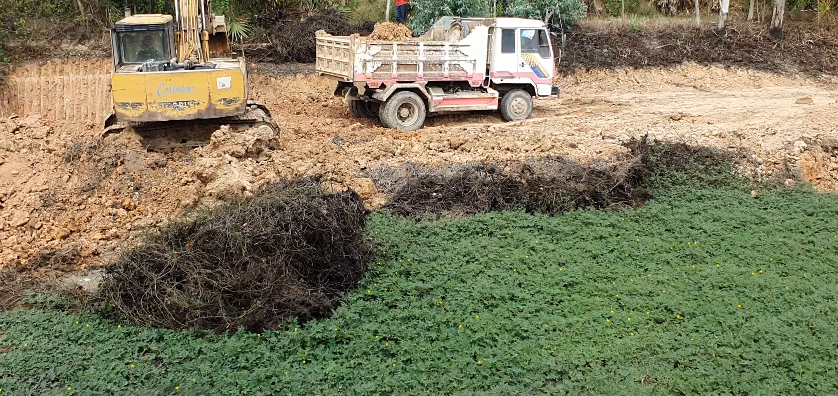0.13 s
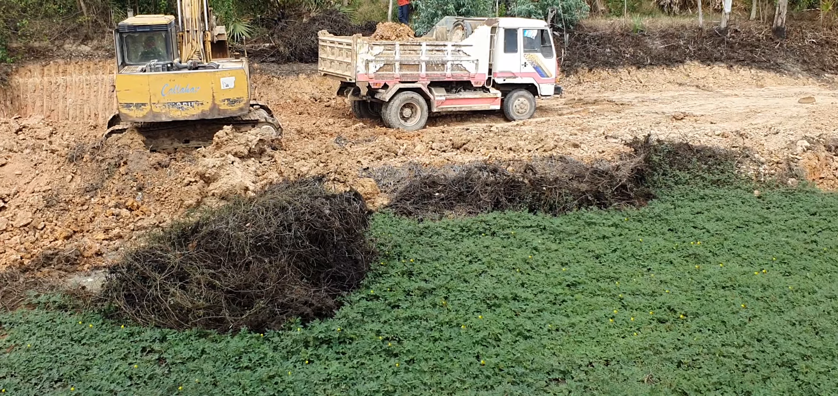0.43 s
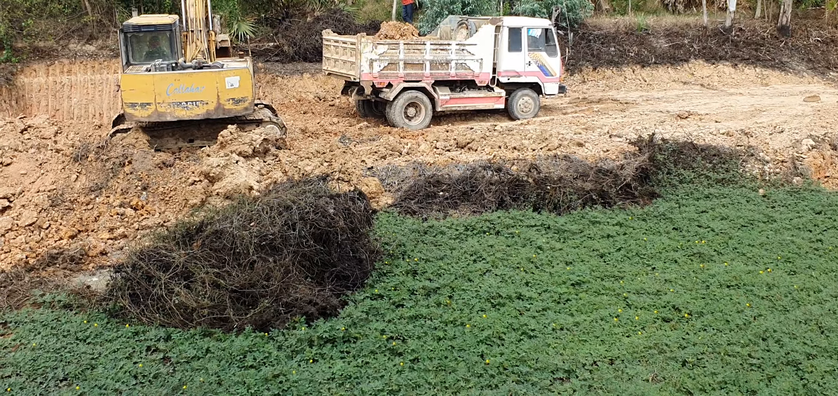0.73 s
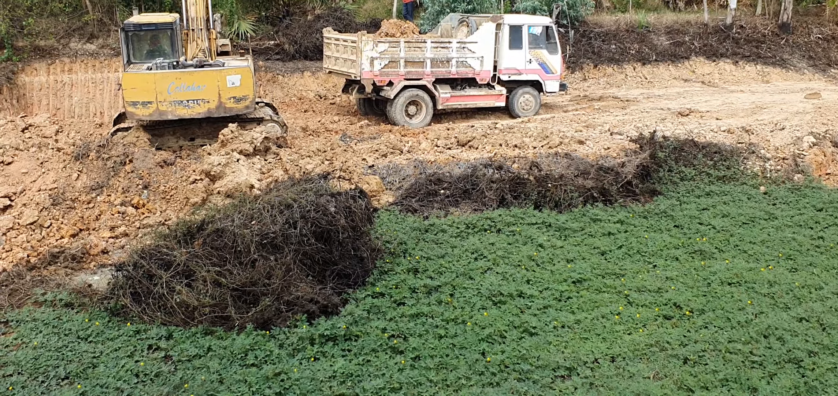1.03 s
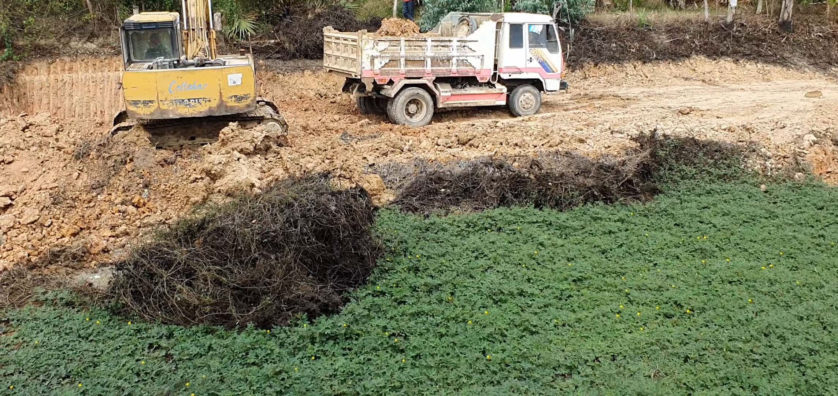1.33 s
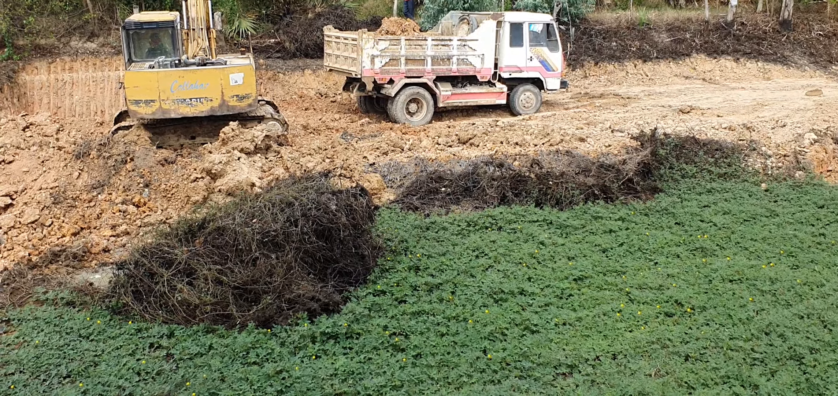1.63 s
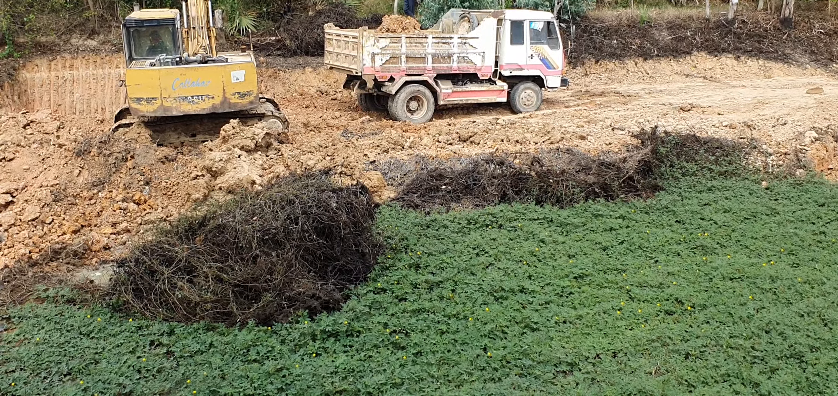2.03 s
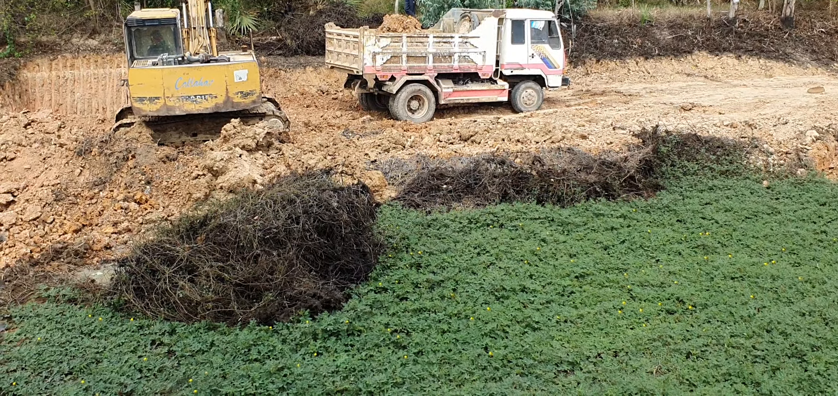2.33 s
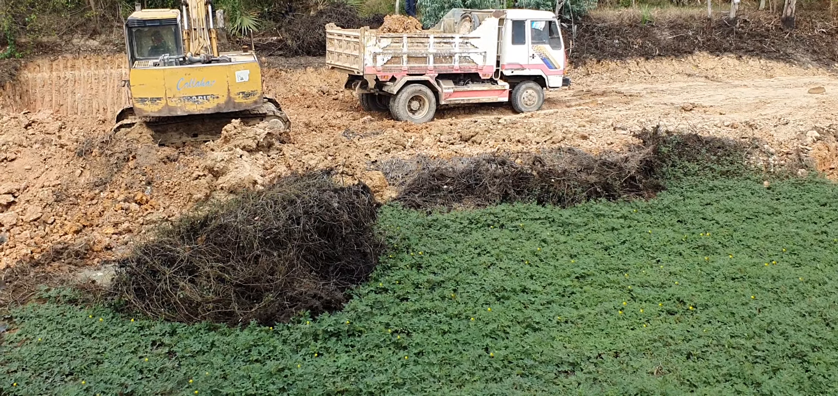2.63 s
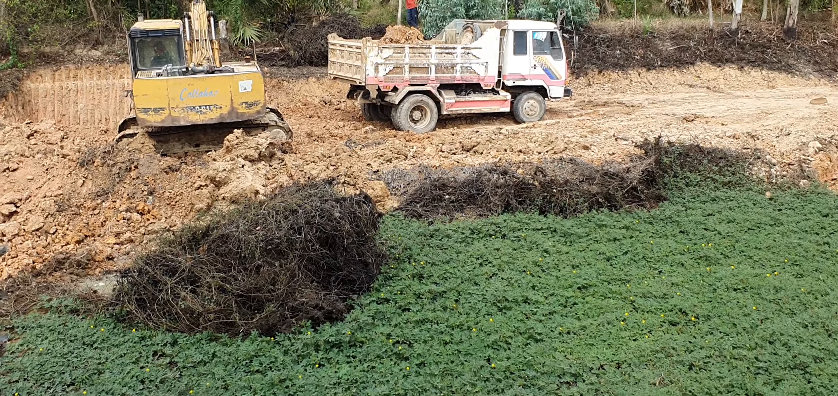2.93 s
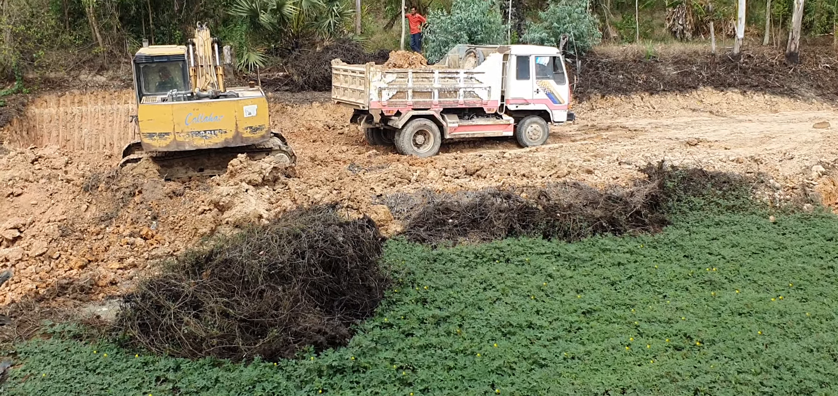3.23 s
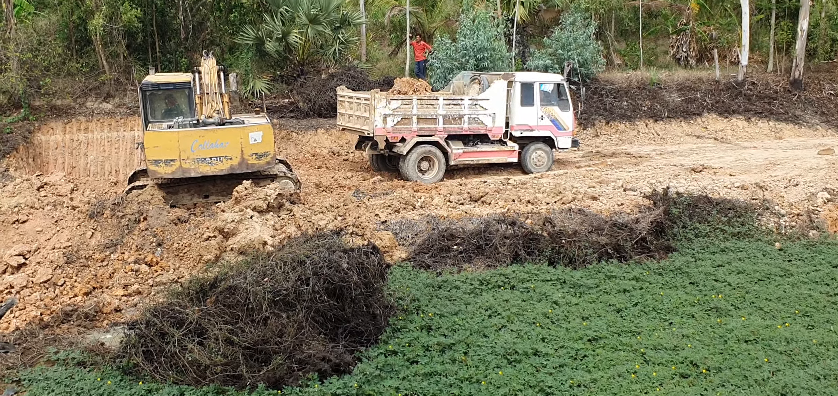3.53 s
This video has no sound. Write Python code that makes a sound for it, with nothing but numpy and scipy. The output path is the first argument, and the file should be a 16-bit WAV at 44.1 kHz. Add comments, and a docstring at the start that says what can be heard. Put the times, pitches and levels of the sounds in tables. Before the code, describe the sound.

Heavy diesel machinery runs with a throbbing rumble, light rattling and a single clank.

```python
"""An open earthworks site: off to the left, by an excavator and a dump truck, a four-cylinder diesel runs.
Its exhaust throbs at the firing rate and drones on the fifth firing harmonic; block clatter, hiss and
a gritty rasp pulse with the firings. The speed lifts a little, then sags as a load comes on, and a
loose panel rattles. Steelwork scrapes, clanks once and squeaks faintly; a thin whine flutters behind."""
import sys
import numpy as np
from scipy import signal
from scipy.fft import rfft, irfft
from scipy.io import wavfile

SR = 44100
rng = np.random.default_rng(int(sys.argv[2]) if len(sys.argv) > 2 else 0)


def dump_mix(stems):
    """Bounce the given channels to the path in sys.argv[1] as a 16-bit WAV at rate SR."""
    frames = np.atleast_2d(stems).T  # one column per channel
    limited = np.clip(frames, -1, 1)  # hard clip at full scale
    pcm = np.round(limited * 32767).astype(np.int16)
    wavfile.write(sys.argv[1], SR, pcm)


N = 161847
T = np.arange(N) / SR
HZ = np.maximum(np.arange(N // 2 + 1) * SR / N, 1)
FIRINGS_PER_TURN = 2

# crankshaft speed: t/s, speed/(turns per s)
CRANK_SPEED = [(0.0, 27.6), (0.15, 27.8), (0.4, 28.4), (0.6, 28.4), (0.72, 29.1), (0.93, 28.85),
               (1.07, 27.868), (1.45, 27.995), (1.72, 27.7), (1.86, 27.614), (2.08, 27.59), (2.65, 27.66),
               (2.95, 27.3), (3.12, 27.6), (3.27, 27.251), (3.67, 27.4)]


def from_db(db):
    """Decibels to gain."""
    return 10 ** (np.asarray(db) / 20)


def unit_rms(x):
    """Scale to unit power."""
    return x / np.sqrt(np.mean(np.abs(x) ** 2) + 1e-20)


def in_time(rows):
    """A curve of (t/s, value) rows at every sample."""
    return np.interp(T, *np.transpose(rows))


def at_hz(rows):
    """A curve of (f/Hz, value) rows at every frequency."""
    hz, value = np.transpose(rows)
    return np.interp(np.log(HZ), np.log(hz), value)


def pan(left_db):
    """Left and right gains, the left louder by left_db; their mean is 1."""
    gains = from_db(np.array([[.5], [-.5]]) * left_db)
    return gains / gains.mean(0)


def drift(rate):
    """Smooth random motion of rms 1, changing about `rate` times a second."""
    hop, settle = 40, 2000
    pole = np.exp(-2 * np.pi * rate * hop / SR)
    noise = rng.standard_normal(N // hop + settle + 2)
    slow = signal.lfilter([1], [1, -2 * pole, pole * pole], noise)[settle:]
    return np.interp(np.arange(N) / hop, np.arange(len(slow)), unit_rms(slow))


def channel_phase():
    """The left leads slightly: earlier arrival in mids and treble, microphone phase mismatch in bass."""
    # lead of the left channel: f/Hz, lead/ms
    lead = [(55, 0.59), (280, 0.099), (1100, .14), (1900, 0.21), (3300, 0.35), (6000, 0.219), (9000, 0.264),
            (15000, 0.298)]
    return np.exp(2j * np.pi * HZ * at_hz(lead) / 1000 * np.array([[.5], [-.5]]))


def air_noise(spectrum):
    """Stereo noise of the given colour, wider towards the treble; rms 1."""
    # likeness of left and right: f/Hz, coherence/0-1
    likeness = [(50, .99), (250, .96), (430, .9), (600, .92), (1000, .76), (1500, .62), (2500, .48),
                (3300, .26), (6000, .45), (10000, .33), (16000, .28)]
    alike = at_hz(likeness)
    mid, side = rfft(rng.standard_normal((2, N)))
    pair = np.sqrt(1 + alike) * mid + np.sqrt(1 - alike) * side * [[1], [-1]]
    return unit_rms(irfft(pair * spectrum * channel_phase(), N))


def partial(angle, unsteady, rate):
    """One stereo tone whose `unsteady` share (0-1) wanders in level and phase; rms about 1."""
    wander = np.sqrt(1 - unsteady ** 2) + unsteady * unit_rms(drift(rate) + 1j * drift(rate))
    pitch_bin = int(angle[-1] / (2 * np.pi))
    tone = np.exp(1j * (angle + rng.uniform(0, 2 * np.pi)))
    return np.sqrt(2) * np.real(channel_phase()[:, [pitch_bin]] * wander * tone)


def resonances(modes):
    """Spectrum of a body from its (f/Hz, width/Hz, level/dB) rows."""
    powers = (from_db(db) ** 2 / (1 + (2 * (HZ - hz) / width) ** 2) ** 2 for hz, width, db in modes)
    return np.sqrt(sum(powers))


def bursts(crank, per_turn, decay_s, uneven_db):
    """Envelope of sharp, uneven hits locked to the crank; rms 1."""
    cycles = per_turn * crank / (2 * np.pi) + .7
    age = cycles % 1 / (per_turn * in_time(CRANK_SPEED))
    strength = from_db(uneven_db * rng.standard_normal(size=400))[cycles.astype(int)]
    return unit_rms(strength * (1 - np.exp(-age / .0008)) * np.exp(-age / decay_s))


def site_echoes(count=10, share=0.2):
    """Weak reflections from bank, truck and trees comb the spectrum of each channel."""
    lags_s = rng.uniform(.002, .03, (count, 1, 1)) + rng.uniform(-.0002, .0002, (count, 2, 1))
    return np.abs(1 + share / np.sqrt(count) * np.exp(-2j * np.pi * HZ * lags_s).sum(0))


def squeaks():
    """Dry joints give thin, wavering squeaks that swell and fade."""
    # squeaks: t/s, length/s, f/Hz, half-width/Hz, level/dB
    cues = [(.51, .28, 8660, 150, -61), (.595, .025, 5900, 250, -53), (2.505, .06, 10700, 250, -55),
            (2.762, .015, 5900, 150, -49), (3.22, .22, 8650, 800, -59), (3.238, 0.19, 5800, 600, -51.5),
            (3.608, 0.036, 5640, 200.3, -54)]
    out = np.zeros((2, N))
    for start, length, hz, half_width, db in cues:
        swell = np.cos(np.pi * np.clip((T - start) / length, -.5, .5))  # peaks at the cue time
        out += from_db(db) * swell * air_noise(1 / (1 + ((HZ - hz) / half_width) ** 2))
    return out


def whine(hz=582):
    """A fluttering tone that holds its pitch whatever the engine speed."""
    # surges of the whine: t/s, level/dB
    level = [(0, -41), (.36, -45), (.41, -33), (.48, -33), (.52, -42), (.6, -35.5), (.73, -45),
             (.78, -30.5), (.85, -29), (.91, -43), (1.07, -36), (1.2, -50), (1.95, -43), (2.03, -27),
             (2.12, -39), (3.0, -38.5), (3.67, -39)]
    return from_db(in_time(level)) * partial(2 * np.pi * hz * T, unsteady=0.71, rate=16.5)


def scrapes(grit_db=3.5):
    """Steel drags over stony ground in short gritty strokes; dull ones favour the lowest ring."""
    # strokes: t/s, length/s, level/dB, low-pass/Hz
    strokes = [(.925, 0.067, -35, 6000), (.958, 0.046, -32, 1400), (.97, 0.11, -42, 5000),
               (1.07, 0.062, -38, 2500)]
    # resonances of the scraping steel: f/Hz, width/Hz, level/dB
    modes = [(840, 110, 11), (1350, 180, 8), (1900, 330, 2), (2520, 400, 2), (3280, 500, -4),
             (4100, 980, -7), (5600, 1200, -11)]
    out, body = np.zeros((2, N)), resonances(modes)
    grit = unit_rms(from_db(grit_db * drift(rate=77)))
    for start, length, db, bright_hz in strokes:
        along = np.clip((T - start) / length, 0, 1)
        stroke = 2 * np.sqrt(along * (1 - along))
        out += from_db(db) * stroke * grit * air_noise(body / np.hypot(1, (HZ / bright_hz) ** 2))
    return out


def clank():
    """Three quick bumps ring and rattle the steelwork; a softer contact loses the upper modes."""
    # bumps: t/s, level/dB, low-pass/Hz, relative rattle level/dB, rattle t60/s
    bumps = [(1.591, -21.5, 2040, -5, .22), (1.617, -28.5, 2540, -4.5, 0.22), (1.672, -34, 1300, -1, .2)]
    # modes of the steelwork: f/Hz, relative level/dB, t60/s
    modes = [(337.7, 6, 0.4), (504, -2.5, 0.3), (726, -2, .22), (876, 4, 0.24), (903, 2, 0.17),
             (1136, -3, 0.11), (1148, 3, 0.15), (1290, 4, 0.091), (1488, 1.5, 0.15), (1610, -6, 0.16),
             (1870, -3.5, 0.16), (2200, -11, .16), (2440, -16, .14)]
    out = np.zeros((2, N))
    for start, db, bright_hz, rattle_db, rattle_t60 in bumps:
        age, ring = np.maximum(T - start, 0), 0
        for hz, mode_db, t60 in modes:
            contact = 1 / np.hypot(1, (hz / bright_hz) ** 4)
            tone = np.sin(2 * np.pi * hz * age + rng.uniform(0, 2 * np.pi))
            ring += contact * from_db(mode_db - 60 * age / t60) * tone
        colour = HZ / (HZ + 900) ** 2 * (HZ / (HZ + 300)) ** 2 / np.hypot(1, (HZ / bright_hz) ** 3)
        rattle = air_noise(colour) * from_db(rattle_db - 60 * age / rattle_t60)
        attack = 1 - np.exp(-age / 0.0034)
        out += from_db(db) * attack * (0.41 * ring + rattle)
    return pan(left_db=0.5) * out


def panel(crank):
    """A loose panel chatters once a turn, surging as the engine labours."""
    # surges of the chatter: t/s, level/dB
    level = [(0, -43.5), (1.0, -44), (1.85, -48), (2.04, -45), (2.1, -34), (2.25, -39), (2.35, -38.5),
             (2.55, -45), (2.85, -46), (3.3, -49), (3.38, -39), (3.46, -47), (3.67, -44)]
    # resonances of the panel: f/Hz, width/Hz, level/dB
    modes = [(830, 140, 5), (1215, 40, -4), (1510, 37, 10.5), (1690, 90, -3), (1936, 110, 9), (2090, 66, 6),
             (2870, 200, -2.5), (3220, 160, -4.5)]
    shakes = bursts(crank, per_turn=1, decay_s=0.064, uneven_db=4)
    return pan(left_db=0.5) * from_db(in_time(level)) * shakes * air_noise(resonances(modes))


def rasp(crank):
    """Each firing shakes a short, bright burst out of loose metal."""
    # rasp coming in with the load: t/s, level/dB
    level = [(0, -73), (.45, -68), (.9, -72), (1.1, -58), (1.45, -53.5), (1.62, -51.5), (1.69, -47),
             (1.85, -48.8), (2.0, -52.5), (2.14, -49.5), (2.25, -56), (2.5, -54), (2.7, -59), (3.05, -73),
             (3.22, -56), (3.29, -52), (3.37, -67), (3.67, -57)]
    # resonances of the loose metal: f/Hz, width/Hz, level/dB
    modes = [(4899, 900, 4), (5950, 1200, 5), (8700, 2150, -3.5), (11200, 1300, 0.5), (12800, 1400, -4),
             (14900, 1500, -2)]
    shakes = bursts(crank, FIRINGS_PER_TURN, decay_s=0.013, uneven_db=2)
    return pan(left_db=1.5) * from_db(in_time(level)) * shakes * air_noise(resonances(modes))


def clatter_and_hiss(crank, clatter_db=-29.5, crossover_hz=2960):
    """Block and fan clatter in the mids and hiss in the treble, swelling a little at each firing."""
    # colour of the clatter: f/Hz, left level/dB, right level/dB
    clatter_eq = [(247, -17, -14), (324, -2.5, -9), (370, 4, -5.5), (374, 7.5, -5), (400, -7.5, -6),
                  (450, -5, -7.5), (490, -1.5, -2.5), (520, -3, -8), (575, -6, -3), (637, -1.5, -10.0),
                  (665, -5.5, -8.5), (745, -6.5, -11), (830, -9, -6), (880, -5, -11.5), (912, -13, -9),
                  (984, -12, -7.5), (1010, -16.5, -10.5), (1070, -8, -16), (1125, -8.5, -9),
                  (1284, -13, -12), (1330, -15.5, -10.5), (1440, -11.5, -14.5), (1625, -18, -10),
                  (1760, -22, -18.5), (1814, -14, -12), (1950, -20, -14.5), (2090, -16.5, -13),
                  (2250, -16, -14.5), (2360, -19, -16), (2770, -20, -25.5), (2960, -20, -25),
                  (3120, -21.5, -35), (3500, -25, -28.5), (5000, -39, -40)]
    # slow swell of the clatter: t/s, gain/dB
    swell = [(0, .5), (.6, 1), (1.2, 0.4), (2.1, 1.8), (2.9, 0), (3.67, 0.6)]
    # colour of the hiss: f/Hz, level/dB
    hiss_eq = [(2800, 7.5), (3200, 5.5), (3550, 3.5), (4800, 0), (6000, -2), (7200, -7), (7900, -27),
               (8600, -8), (9800, -15), (10700, -20), (11500, -6), (12200, -12), (14000, -18), (15200, -23),
               (15800, -18)]
    # rise and fall of the hiss: t/s, level/dB
    hiss_level = [(0, -48.5), (.5, -47.5), (.88, -47.8), (1.3, -46.5), (2.1, -46.5), (2.6, -47.5),
                  (3.0, -49), (3.3, -48.5), (3.67, -48)]
    echoes = site_echoes()
    low_share = 1 / (1 + (HZ / crossover_hz) ** 12)
    colour = from_db([at_hz(np.array(clatter_eq)[:, [0, side]]) for side in (1, 2)])
    clatter_gain = from_db(clatter_db + in_time(swell) + .5 * drift(rate=3.5))
    clatter = clatter_gain * air_noise(colour * echoes * np.sqrt(low_share))
    hiss_gain = pan(left_db=2.5) * from_db(in_time(hiss_level) + 0.59 * drift(rate=16))
    hiss = hiss_gain * air_noise(from_db(at_hz(hiss_eq)) * echoes * np.sqrt(1 - low_share))
    beat = -np.cos(FIRINGS_PER_TURN * crank)
    return clatter * (1 + 0.018 * beat) + hiss * (1 + 0.1 * beat)


def exhaust(crank, rumble_db=-31):
    """Firing pulses give a throb, a drone, its octave and weaker partials over a low rumble."""
    # throb at the firing rate: t/s, level/dB
    throb_level = [(0.05, -26), (0.84, -33), (1.17, -27.5), (1.74, -25), (1.79, -31), (1.84, -25.5),
                   (3.57, -24), (3.62, -25.5)]
    # drone on the fifth firing harmonic: t/s, level/dB
    drone_level = [(0.05, -19.5), (0.45, -20.5), (0.62, -23.5), (0.7, -20.5), (0.84, -22), (1.3, -18.7),
                   (1.39, -21.5), (1.45, -20.5), (2.93, -19.5), (3.32, -23), (3.57, -20.2), (3.62, -21.5)]
    # octave above the drone: t/s, level/dB
    octave_level = [(0, -41), (.7, -44), (1.2, -41), (1.62, -38), (1.7, -33.5), (1.8, -45), (2.25, -34.5),
                    (2.6, -40.5), (3.67, -39)]
    # engine and fan partials, keyed by quarter multiples of crank speed: level/dB, unsteady share/0-1
    weak_partials = {6: (-44.5, 0.7), 10: (-42, 0.13), 12: (-42, 0.18), 14: (-47.5, 0.3), 15: (-40, 0.42),
                     16: (-32, 0.29), 20: (-44.5, 0.17), 24: (-39.5, 0.52), 32: (-43.5, 0.62),
                     35: (-45, 0.47), 50: (-46.5, 0.57), 55: (-43.5, 0.89), 72: (-48, 0.99)}
    # colour of the rumble: f/Hz, level/dB
    rumble_eq = [(20, -21), (32, -19), (42, -12), (70, 9), (100, -6.5), (145, -9.5), (185, 4), (235, 4),
                 (285, 7.5), (340, 0), (420, -36.5)]
    firing = FIRINGS_PER_TURN * crank
    throb = from_db(in_time(throb_level)) * partial(firing, unsteady=0.062, rate=9.4)
    drone = from_db(in_time(drone_level)) * partial(5 * firing, unsteady=0.04, rate=15)
    octave = from_db(in_time(octave_level)) * partial(10 * firing, unsteady=0.95, rate=9.3)
    tones = pan(left_db=1.1) * throb + pan(left_db=8.5) * drone + octave
    for quarters, (db, unsteady) in weak_partials.items():
        tones += pan(left_db=3) * from_db(db) * partial(crank * quarters / 4, unsteady, rate=7.6)
    rumble = from_db(rumble_db) * air_noise(from_db(at_hz(rumble_eq)))
    return tones + pan(left_db=0.5) * rumble


def scene():
    """One crank angle drives the engine and the metal it shakes; whine and steelwork sit around it."""
    crank = 2 * np.pi * np.cumsum(in_time(CRANK_SPEED)) / SR
    engine = exhaust(crank) + clatter_and_hiss(crank) + rasp(crank) + panel(crank)
    return engine + whine() + scrapes() + squeaks() + clank()


def record(dry):
    """Short fades at both ends and a steep cut of the top treble."""
    fade_s, cutoff_hz = .004, 15700
    fade = np.clip(np.minimum(T, T[-1] - T) / fade_s, 0, 1)
    return signal.sosfilt(signal.ellip(12, .1, 80, cutoff_hz, fs=SR, output="sos"), dry * fade)


dry = scene()
out = record(dry)
dump_mix(out)
```